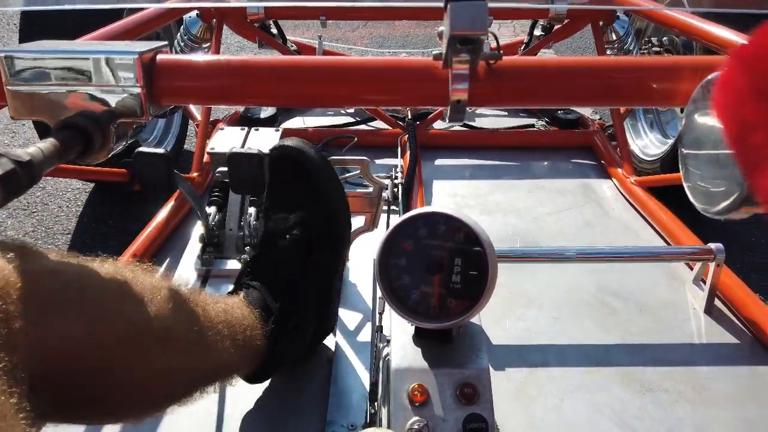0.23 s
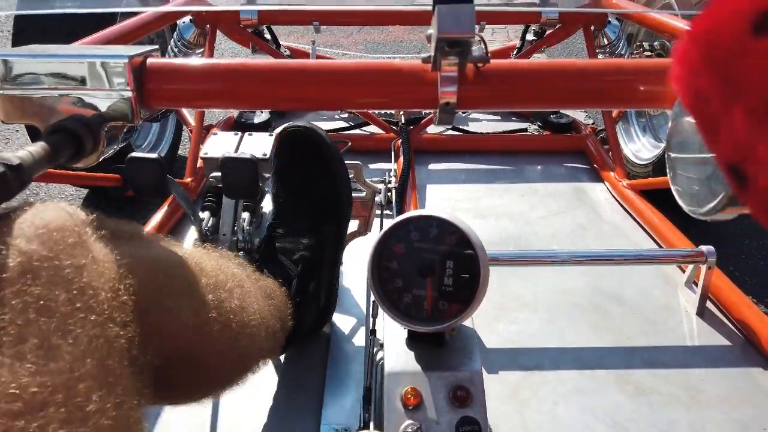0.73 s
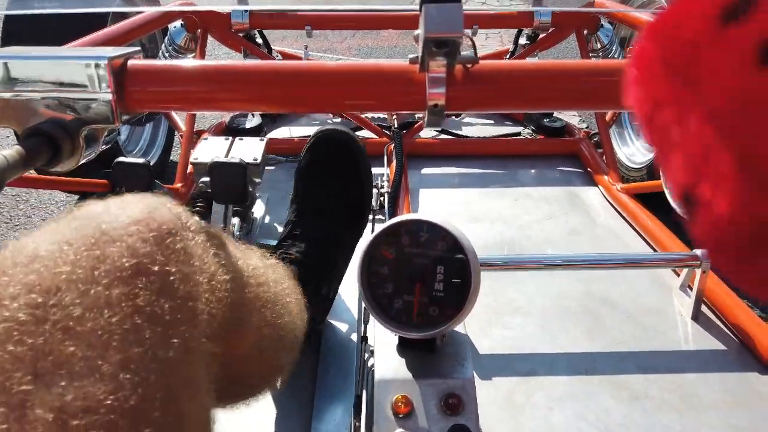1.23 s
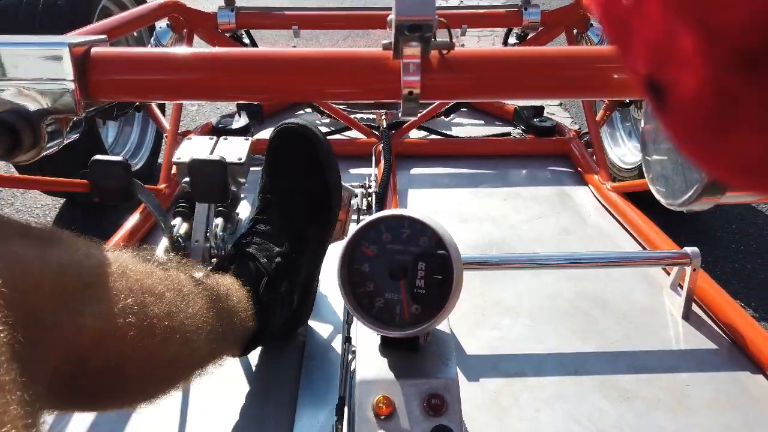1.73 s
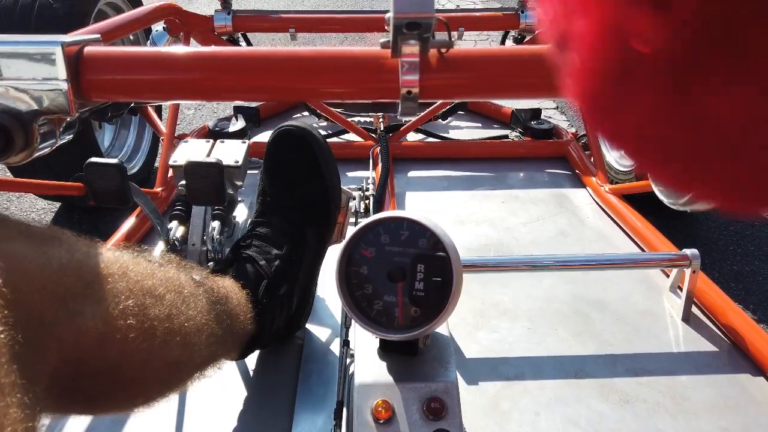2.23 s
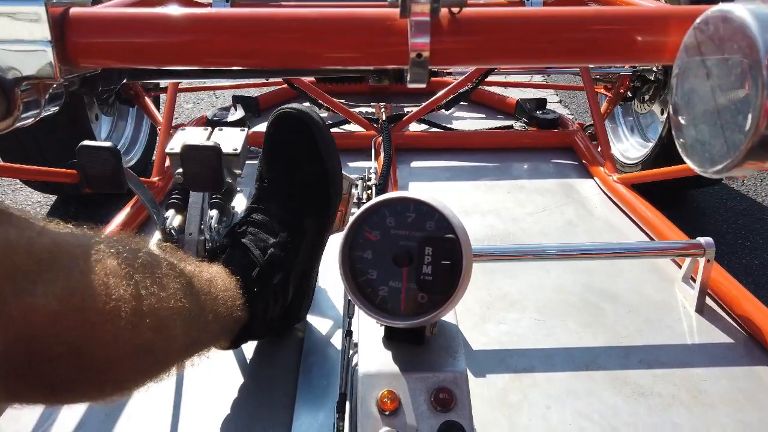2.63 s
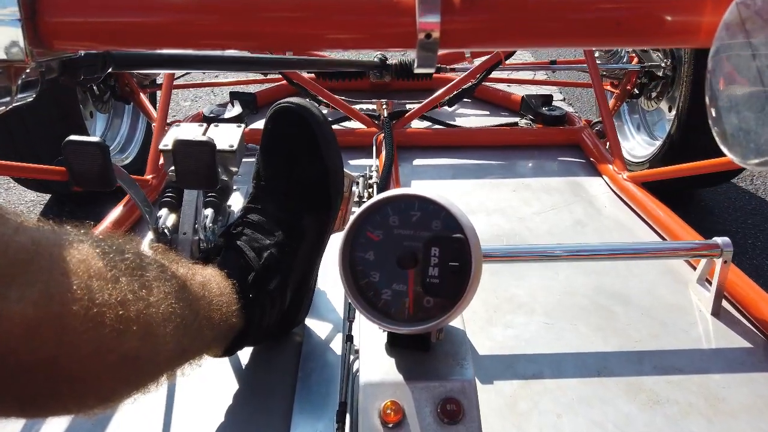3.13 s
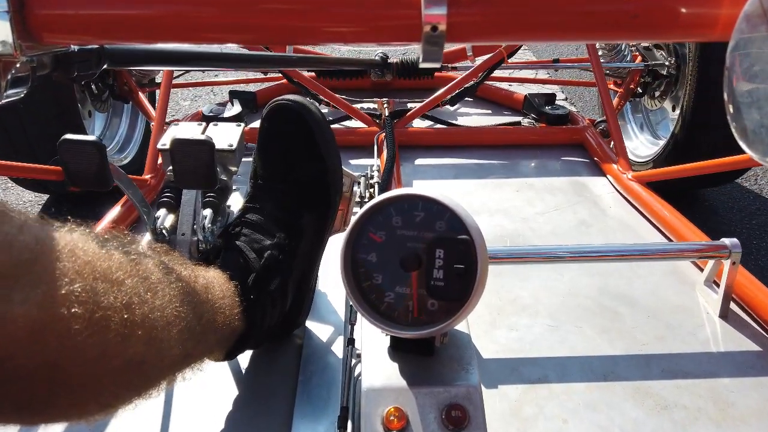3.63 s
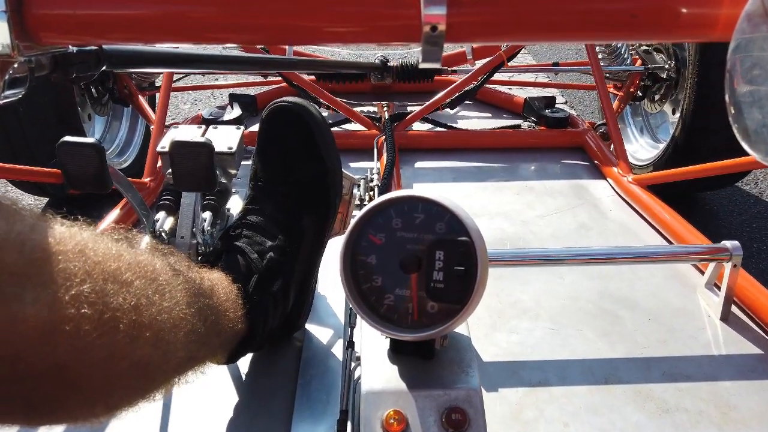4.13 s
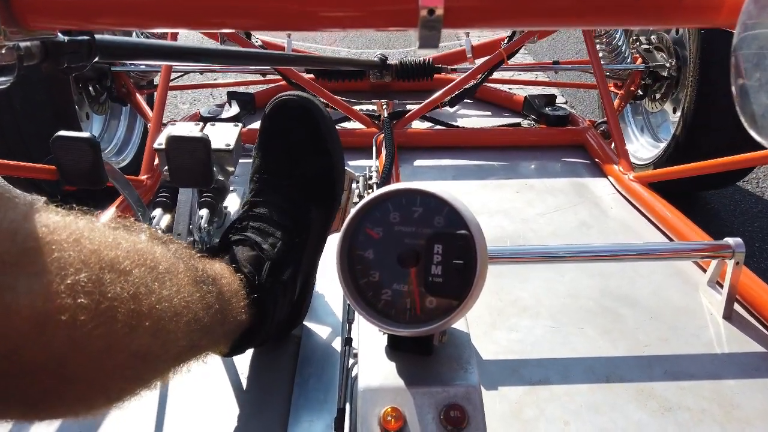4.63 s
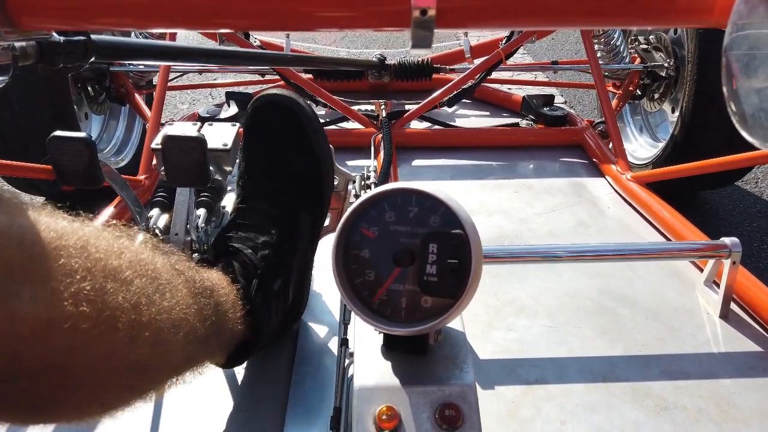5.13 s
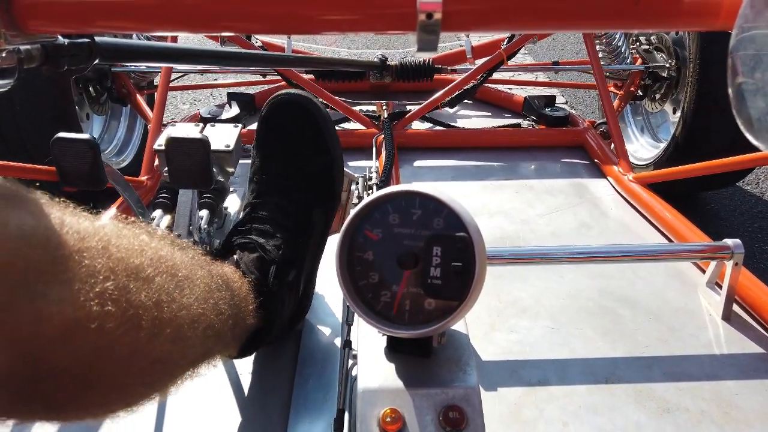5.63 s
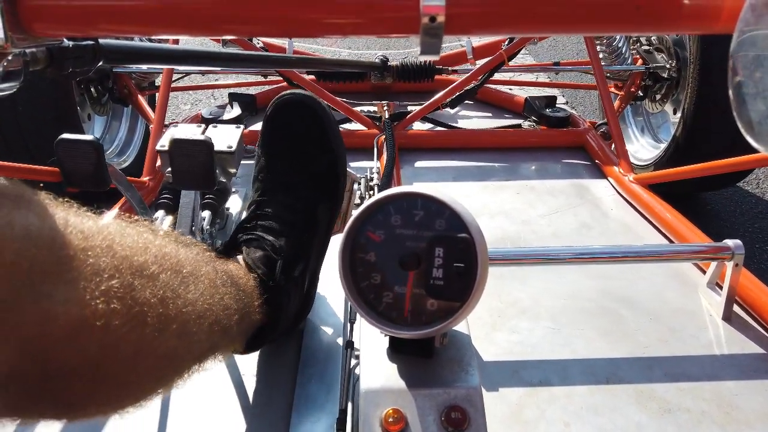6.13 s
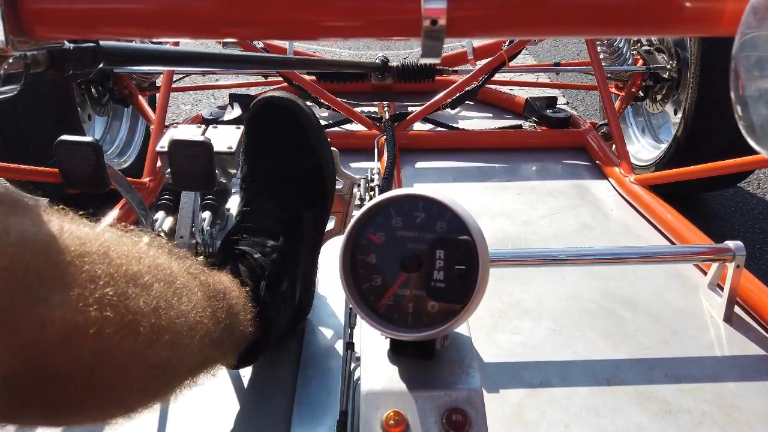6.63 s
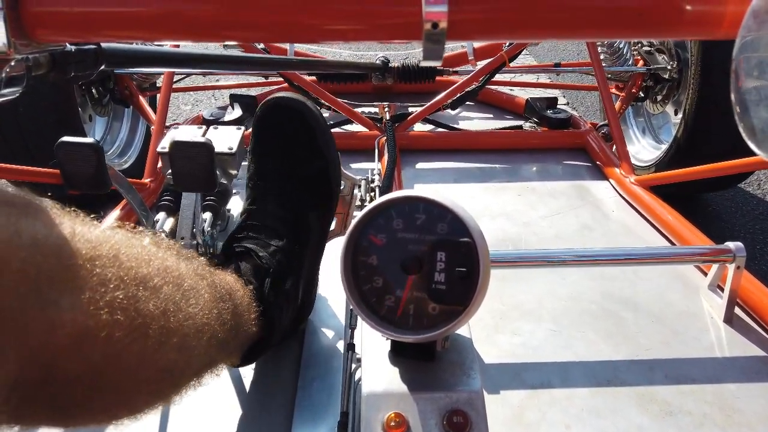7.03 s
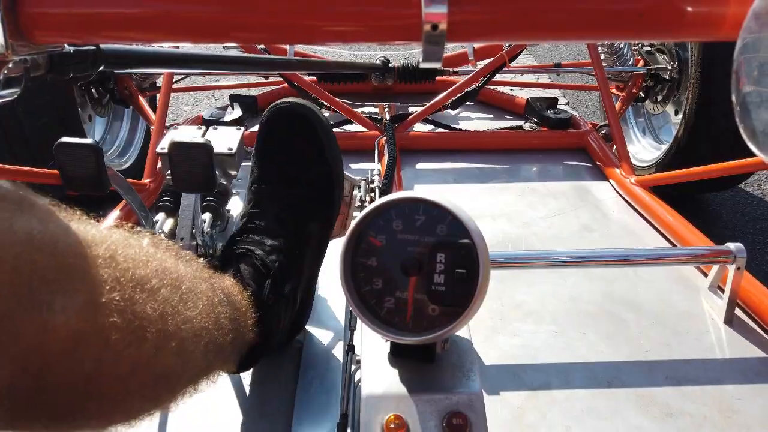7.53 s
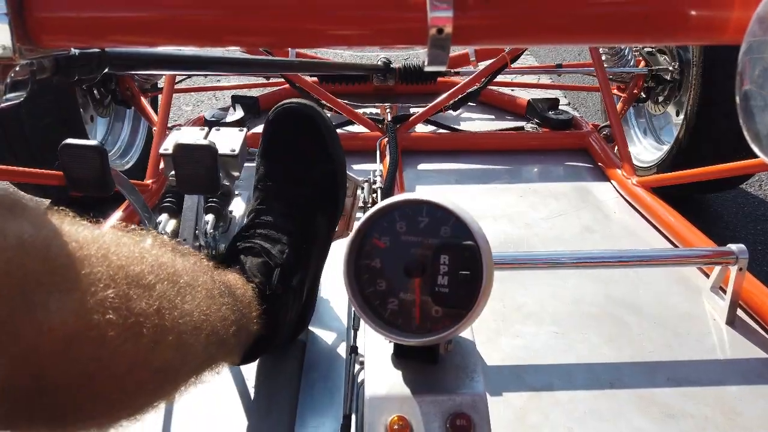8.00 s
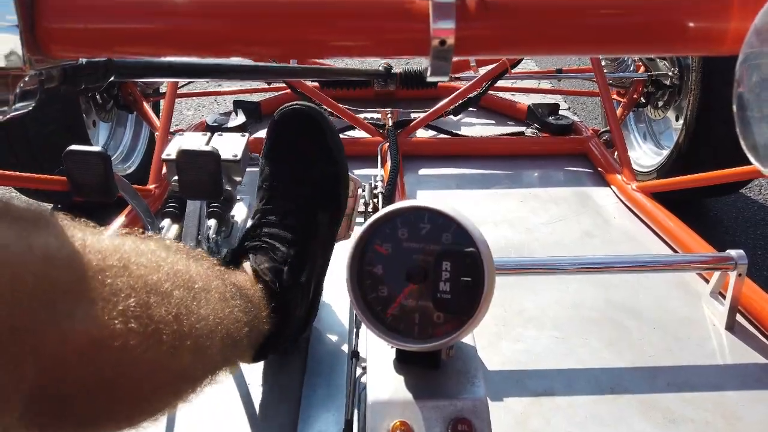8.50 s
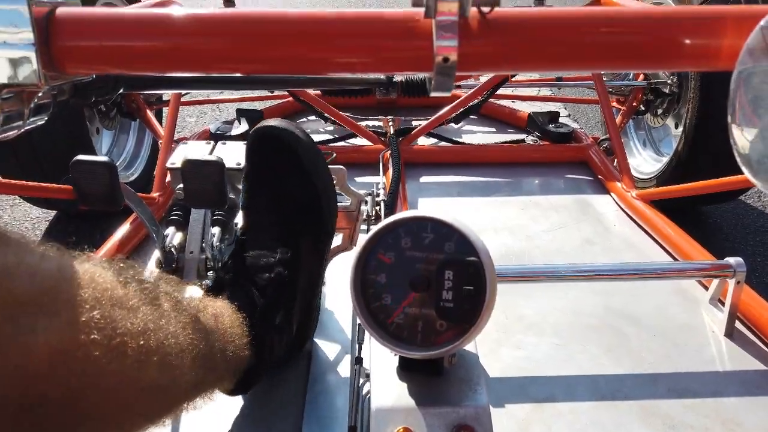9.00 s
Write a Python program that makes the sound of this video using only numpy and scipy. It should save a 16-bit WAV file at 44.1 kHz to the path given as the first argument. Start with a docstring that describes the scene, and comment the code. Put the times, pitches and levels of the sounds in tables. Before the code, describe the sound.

Heard from the open seat of a buggy outdoors, an air-cooled engine chugs at an uneven idle, missing now and then under a light metallic clatter. After several seconds come two quick revs, with faint, bright squeaks from the throttle linkage and air rushing through the carburettor. The engine sinks back and falters briefly before a last, longer and higher rev, which winds down again.

```python
"""Revving a buggy engine

An air-cooled four-cylinder engine idles lumpily, heard from the driver's seat in the open air.
Each firing rings the exhaust and shakes the block; valve gear ticks, small parts ring, the fan blows.
The pedal is pushed three times: the throttle linkage chirps, air roars in through the carburettor,
and the engine races, then runs down towards a weak, stumbling idle."""
import sys
import numpy as np
from scipy import signal
from scipy.fft import rfft, irfft, next_fast_len
from scipy.io import wavfile
from scipy.ndimage import uniform_filter1d

SR = 44100
rng = np.random.default_rng(int(sys.argv[2]) if len(sys.argv) > 2 else 0)


def dump(signal):
    """Clip the signal to [-1, 1] and save it as 16-bit WAV at the path in sys.argv[1]."""
    limited = np.clip(np.atleast_2d(signal).T, -1, 1)
    pcm = np.round(limited * 32767).astype(np.int16)
    wavfile.write(sys.argv[1], SR, pcm)


N = 408366

IDLE_RATE = 26   # the usual idle, in firings per second
# The wandering idle. Each row: time in seconds, firings per second.
IDLE_SPEED = [(0, 26.12), (.6, 25.44), (1.2, 25.99), (1.8, 25.88), (2.4, 27.07), (3, 25.67), (3.6, 26.67),
              (4.2, 26.59), (4.5, 24.71), (4.86, 28.45), (6.2, 26.41), (7.6, 24.5), (8.22, 25.6)]
# Pushes of the pedal. Each row: down and up times in seconds, top speed in firings per second,
# seconds for the speed to fall to about a third.
PEDAL_PUSHES = [(4.865, 5.098, 83.5, .827), (6.257, 6.502, 83.5, .851), (8.25, 8.645, 103.3, 1.02)]
# How strongly the engine fires when left to idle. Each row: time in seconds, level change in dB.
IDLE_STRENGTH = [(0, -0.5), (2.4, 0), (3.1, -1.5), (3.6, .5), (4.4, -2.5), (4.82, 1.5), (5.7, -2.5),
                 (6.03, -7.5), (6.2, -4), (7.15, -4), (7.5, -6.5), (7.75, -11), (8.22, -6.5)]
# The strength of each of the four cylinders at idle, in dB.
CYLINDER_DB = [-3, 0, -2.5, 0]
# Firings that miss or kick. Each row: time in seconds, dB above the usual firing.
ODD_FIRINGS = [(.15, -16), (.22, -7), (.61, -14), (.69, -6), (.93, -14), (1.16, -8), (1.54, -14),
               (1.58, 3.5), (1.85, -17), (2.08, -28), (2.31, -15), (2.6, -24), (2.68, -7), (2.91, -8),
               (3.37, -20), (3.67, -8), (4.12, -28), (5.8, 11.5), (5.96, 9.5), (6.28, 3), (7.28, 12),
               (7.41, 0), (7.55, 5), (7.59, -11), (8.0, -12), (8.26, 4)]
# How loud the layers are. Each lists: dB at idle, dB added per doubling of speed, dB added at full
# throttle, the share of IDLE_STRENGTH it follows, dB added as the engine warms up.
BOOM_LEVEL = (-20.0, 3.5, 2.5, 0.97, -0.5)
BARK_LEVEL = (-26, 6, 0, 1.0, 0)
ROAR_LEVEL = (-41, 7, 8, 0.63, -5.5)
HISS_LEVEL = (-49, 5, 2.5, 0.85, -2.5)
# With the throttle shut, the pipes favour some speeds and swallow others.
# Each row: firings per second, change to the boom in dB, change to the bark in dB.
PIPE_TUNING = [(29.6, 0.5, 0.5), (37, -8, -2.5), (46, -4, -8), (61, -0.5, -1.5), (75.9, 0, -0.5),
               (86, -3, -9.5), (104, -1.5, -5)]
# Pitches at which the exhaust (boom and bark), throttle linkage and air intake ring.
# Each row: pitch in Hz, width in Hz (narrow rings longer), relative level in dB.
BOOM_MODES = [(51.6, 10.6, 21), (85, 20, -13)]
BARK_MODES = [(156.2, 18.6, 42), (127, 18, -18), (150, 120, -21)]
LINKAGE_MODES = [(6930, 58, -6), (7340, 240, -4), (8050, 310, -4), (8700, 100, -11), (10500, 150, -11),
                 (13700, 2000, -20)]
INTAKE_MODES = [(221, 37, -0.5), (352, 230, -2), (493, 45, 1.5), (720, 53, -3), (1300, 480, 0.5)]
# The tone colour of four noises: engine block, valve knocks, cooling air and intake air.
# Each row: frequency in Hz, relative level in dB.
BLOCK_SPECTRUM = [(160, -57), (270, -2), (377, -4.5), (427, 5.5), (520, -10), (733, -4), (813, -10),
                  (977, -6), (1060, -5.5), (1410, -8.5), (2130, -10.5), (2390, -10), (3420, -15),
                  (3580, -12), (4200, -19.5), (5460, -29), (9240, -120)]
KNOCK_SPECTRUM = [(1000, -20), (2000, 5.5), (3300, 2), (4800, 4), (6300, -1.5), (8000, 0), (9500, -1.5),
                  (11000, 5), (13000, -3.5), (16000, -1.5)]
COOLING_SPECTRUM = [(1760, -18.5), (3000, 3), (3330, -7), (3620, -6), (4050, -6), (4630, -6), (6670, -6),
                    (9330, -7), (10900, -2), (15100, -14), (16000, -9)]
INTAKE_SPECTRUM = [(140, -5.5), (230, -12), (299, -16.5), (388, -12.5), (607, -20.5), (662, -11),
                   (798, -13.5), (1350, -11.5), (2130, -14), (2330, -18.5), (4500, -36), (5850, -67),
                   (9900, -120)]
# Valve gear knocks. Each row: place in the engine's cycle in firings (0-4), relative level in dB.
VALVE_KNOCKS = [(.2, -2.5), (1.45, -30), (2.16, 3), (2.85, -27), (3.34, 3.5), (3.55, -8)]
# Small parts that ring once per engine cycle, including the rattling throttle linkage.
# Each row: place in firings (0-4), pitch in Hz, width in Hz, relative level in dB.
ENGINE_RINGS = [(.23, 3675, 50.4, -2), (.3, 9900, 80, -7), (1.41, 15500, 507, -5), (2.22, 3636, 29.1, 1.5),
                (2.22, 3112, 201, 2.5), (2.74, 6900, 45, -2), (2.78, 7500, 205, -0.5),
                (3.43, 3507, 212.3, 2)]
# Chirps of the throttle linkage. Each row: time of the peak in seconds, level in dB.
LINKAGE_CHIRPS = [(4.863, -30), (4.894, -22.5), (6.231, -32), (6.265, -22), (7.856, -35), (8.248, -21.5),
                  (8.306, -23.5), (8.331, -28)]
# Echoes from the floor pan, road and frame. Each row: delay in seconds, relative level in dB.
ECHOES = [(.0029, -35.5), (.00802, -13.5), (0.0136, -16.5), (0.0183, -21)]
# How alike noise is in the two ears. Each row: frequency in Hz, likeness from 0 to 1.
EAR_LIKENESS = [(200, 1), (700, 0.91), (1400, 0.82), (2800, 0.43), (6000, 0.066), (14000, 0.14)]


def from_db(db):
    """Turn decibels into a number to multiply by."""
    return 10 ** (np.asarray(db) / 20)


def rms_one(x):
    """Scale a sound to an average (rms) level of 1."""
    return x / np.sqrt(np.mean(x ** 2) + 1e-20)


def in_time(rows):
    """Join (time, value) points into a curve with a value for every sample."""
    return np.interp(np.arange(N) / SR, *np.transpose(rows))


def at_hz(rows, hz):
    """Read between (frequency, value) points, with octaves evenly spaced."""
    known_hz, values = np.transpose(rows)
    return np.interp(np.log(hz), np.log(known_hz), values)


def keep_band(x, hz, kind, order=2):
    """Keep the "low" part, the "high" part or a middle "band" of a sound."""
    return signal.sosfilt(signal.butter(order, hz, kind, fs=SR, output="sos"), x)


def resonate(x, modes):
    """Let a sound ring an object at several pitches at once."""
    out = 0
    for hz, width, db in modes:
        r = np.exp(-np.pi * width / SR)
        feedback = [1, -2 * r * np.cos(2 * np.pi * hz / SR), r * r]
        out += from_db(db) * (1 - r * r) / 2 * signal.lfilter([1, 0, -1], feedback, x + 1e-18)
    return out


def noise(spectrum=None):
    """Stereo noise whose treble differs between the ears more than its bass."""
    size = next_fast_len(N)
    hz = np.maximum(np.fft.rfftfreq(size, 1 / SR), 1)
    mid, side = rfft(rng.standard_normal((2, size)))
    alike = np.clip(at_hz(EAR_LIKENESS, hz), 0, 1)
    ears = np.sqrt(1 + alike) * mid + np.sqrt(1 - alike) * side * [[1], [-1]]
    colour = 1 if spectrum is None else from_db(at_hz(spectrum, hz))
    return rms_one(irfft(colour * ears, size)[:, :N])


def bursts(times, sizes, rise_s):
    """A bump for each time: it peaks at its size after rise_s, then dies away."""
    clicks = np.zeros(N)
    np.add.at(clicks, np.clip((times * SR).astype(int), 0, N - 1), sizes)
    r = np.exp(-1 / (rise_s * SR))
    return signal.lfilter([0, np.e / (rise_s * SR)], [1, -2 * r, r * r], clicks + 1e-18)


def evened(x, window_s):
    """Even out slow changes in loudness but keep the single beats."""
    size = int(window_s * SR)
    power = uniform_filter1d(uniform_filter1d(x * x, size), size)
    return x / np.sqrt(np.maximum(power, 1e-12))


def crank_times(crank, place, every):
    """Times at which the crank passes a place that comes round every so many firings."""
    return np.interp(np.arange(place, crank[-1], every), crank, np.arange(N) / SR)


def strikes(crank, place, rise_s, scatter_db=1.86):
    """A loose contact that comes round every four firings, never quite equally hard."""
    times = crank_times(crank, place, every=4)
    sizes = from_db(scatter_db * rng.standard_normal(len(times)))
    return uniform_filter1d(bursts(times, sizes, rise_s), size=260)   # slack spreads each contact


def reflected(x):
    """Hard surfaces close by send the sound back and colour it."""
    out = x.copy()
    for delay_s, db in ECHOES:
        out += from_db(db) * np.pad(x, ((0, 0), (int(delay_s * SR), 0)))[:, :N]
    return out / np.sqrt(1 + sum(from_db(db) ** 2 for _, db in ECHOES))


def engine_speed():
    """Firings per second: a steady climb while the pedal is down, then friction slows the engine."""
    seconds = np.arange(N) / SR
    speed = in_time(IDLE_SPEED)
    for down_s, up_s, top, run_down_s in PEDAL_PUSHES:
        climb = np.interp(seconds, [down_s, up_s], [speed[int(down_s * SR)], top], left=0)
        run_down = np.exp(-np.maximum(seconds - up_s, 0) / run_down_s)
        speed = np.maximum(speed, climb * run_down)
    return speed


def throttle_opening(rest=.034, pressed=.86, open_s=.025, shut_s=.062):
    """The throttle (0 shut, 1 wide open) swings open with each push and snaps back on release."""
    seconds = np.arange(N) / SR
    pedal = 0
    for down_s, up_s, _, _ in PEDAL_PUSHES:
        opening = 1 - np.exp(-np.maximum(seconds - down_s, 0) / open_s)
        closing = np.clip(.5 + (up_s - seconds) / shut_s, 0, 1)
        pedal += opening * closing
    return np.clip(rest + (pressed - rest) * pedal, 0, 1)


def loudness(speed, throttle, warm_up_s=6.15, flywheel_rate=75):
    """Boom, bark, roar and hiss in dB: they rise as the engine revs and sag with a weak idle."""
    doublings = np.log2(speed / IDLE_RATE)
    # at speed, the flywheel hides a weak idle
    idling = np.interp(speed, [IDLE_RATE, flywheel_rate], [1, 0]) * (1 - throttle)
    strength_db = idling * in_time(IDLE_STRENGTH)
    warmth = np.minimum(np.arange(N) / SR / warm_up_s, 1)
    layers = BOOM_LEVEL, BARK_LEVEL, ROAR_LEVEL, HISS_LEVEL
    boom, bark, roar, hiss = (
        idle_db + speed_db * doublings + throttle_db * throttle + share * strength_db + warm_db * warmth
        for idle_db, speed_db, throttle_db, share, warm_db in layers)
    rates, boom_tuning, bark_tuning = np.transpose(PIPE_TUNING)
    boom += (1 - throttle) * np.interp(speed, rates, boom_tuning)
    bark += (1 - throttle) * np.interp(speed, rates, bark_tuning)
    roar += 2 * doublings * throttle   # an open throttle makes the roar grow faster with speed
    return boom, bark, roar, hiss


def firings(crank, speed, throttle, smooth_rate=55, scatter_db=2, jitter_s=.00092, load_jitter_s=.00037):
    """Time and strength of each firing: uneven at idle, smoother at speed, ragged under load."""
    times = crank_times(crank, place=1, every=1)
    at = (times * SR).astype(int)
    lumpy = np.clip((smooth_rate - speed[at]) / (smooth_rate - IDLE_RATE), .1, 1)
    size_chance, time_chance = rng.standard_normal((len(times), 2)).T
    cylinder = np.arange(1, len(times) + 1) % 4
    db = lumpy * (np.array(CYLINDER_DB)[cylinder] + scatter_db * size_chance)
    for time_s, odd_db in ODD_FIRINGS:
        db[np.argmin(abs(times - time_s))] += odd_db
    spread_s = np.maximum(jitter_s * lumpy, load_jitter_s * throttle[at])
    return times + spread_s * time_chance, from_db(db)


def exhaust(times, sizes, throttle, boom_db, bark_db):
    """Each firing rings the pipes with a deep boom and a higher bark; off the throttle they burble."""
    def pulses(lead_s):
        return -bursts(times - lead_s, sizes, rise_s=.0011)
    boom = keep_band(resonate(pulses(.0013), BOOM_MODES), [32, 150], "band")
    bark = keep_band(resonate(pulses(.0036), BARK_MODES), 235, "low", order=6)
    bark = keep_band(bark, 85, "high")
    burble = rms_one(keep_band(rng.standard_normal(N), [95, 225], "band", order=6))
    rough_bark = evened(bark, window_s=.17) + from_db(-11) * (1 - throttle) * burble
    # under load the pulses blast straight out instead of booming
    blast = keep_band(pulses(.0025), 45, "high", order=1)
    blast = evened(keep_band(blast, 215, "low", order=4), window_s=.05)
    bass = (1 - throttle) * evened(boom, window_s=.18) + throttle * from_db(1) * blast
    return from_db(boom_db) * bass + from_db(bark_db) * rough_bark


def block_rumble(times, sizes, throb=.18):
    """The engine's metal block rumbles, swelling a little with each firing."""
    beat = evened(bursts(times, np.sqrt(sizes), rise_s=.0035), window_s=.18)
    return noise(BLOCK_SPECTRUM) * evened(1 + throb * beat, window_s=.098)


def valve_gear(crank, grain=.27):
    """The parts that work the valves make the same gritty knocks in every engine cycle."""
    knocks = sum(from_db(db) * strikes(crank, place, rise_s=.0043) for place, db in VALVE_KNOCKS)
    flicker = rms_one(keep_band(rng.standard_normal(N), 1260, "low"))
    grit = np.exp(grain * flicker - grain ** 2)
    return from_db(3.5) * knocks * grit * noise(KNOCK_SPECTRUM)


def engine_rings(crank):
    """Small parts, including the rattling throttle linkage, ring once per engine cycle."""
    def tone(hz, width):
        drift = np.sqrt(2 * np.pi * width / SR) * rng.standard_normal(N)
        return np.sqrt(2) * np.sin(np.cumsum(2 * np.pi * hz / SR + drift))
    return from_db(-.5) * sum(from_db(db) * strikes(crank, place, rise_s=.0042) * tone(hz, width)
                              for place, hz, width, db in ENGINE_RINGS)


def fan_whine(crank, blades_per_firing=28):
    """The cooling fan's blades make an unsteady tone that follows the engine's speed."""
    wobble = 1.56 * rms_one(keep_band(rng.standard_normal(N), 12, "low"))
    return np.sin(2 * np.pi * blades_per_firing * crank + wobble)


def cooling_air():
    """Air hisses as it rushes over the engine."""
    return from_db(4.5) * noise(COOLING_SPECTRUM)


def linkage_chirps(swell_s=.0039):
    """The linkage between pedal and throttle slips in short, bright chirps that swell and fade."""
    ringing = rms_one(keep_band(resonate(noise(), LINKAGE_MODES), 4900, "high", order=4))
    seconds = np.arange(N) / SR
    swells = sum(from_db(db) / np.cosh(np.minimum(abs(seconds - peak_s) / swell_s, 20))
                 for peak_s, db in LINKAGE_CHIRPS)
    return ringing * swells


def intake_roar(times, sizes):
    """The engine gulps air through the carburettor, and each sharp suck makes the intake ring."""
    gulps = evened(bursts(times - .004, sizes, rise_s=.0042), window_s=.07)
    suction = -bursts(times - .002, sizes, rise_s=.0004)
    thump = keep_band(resonate(suction, INTAKE_MODES), 170, "high", order=4)
    return noise(INTAKE_SPECTRUM) * gulps + from_db(-1) * evened(thump, window_s=.079)


def scene():
    """Speed and throttle drive all the engine's sounds; the linkage chirps on top."""
    speed, throttle = engine_speed(), throttle_opening()
    boom_db, bark_db, roar_db, hiss_db = loudness(speed, throttle)
    crank = .2 + np.cumsum(speed) / SR   # how far the engine has turned, counted in firings
    times, sizes = firings(crank, speed, throttle)
    slowness = IDLE_RATE / speed   # at speed, rushing air covers the fan's tone and the clatter
    fan = from_db(-13) * np.sqrt(slowness) * (1 - throttle) * fan_whine(crank)
    # as the throttle opens, the intake takes over from the block
    block = from_db(1.5) * np.sqrt(1 - throttle) * reflected(block_rumble(times, sizes))
    intake = from_db(.5) * np.sqrt(throttle) * intake_roar(times, sizes)
    clatter = from_db(6.5) * slowness ** .8 * (valve_gear(crank) + engine_rings(crank))
    middle = from_db(roar_db) * (block + intake + fan)
    treble = from_db(hiss_db) * reflected(cooling_air() + clatter)
    return exhaust(times, sizes, throttle, boom_db, bark_db) + middle + treble + linkage_chirps()


def record(dry, left_lead_samples=2, merge_hz=260, cutoff_hz=15950):
    """The sound reaches the left side just before the right; the bass is alike in both, the top is cut."""
    left, right = dry[0], np.pad(dry[1], (left_lead_samples, 0))[:N]
    side = keep_band((left - right) / 2, merge_hz, "high", order=1)
    stereo = (left + right) / 2 + side * [[1], [-1]]
    return signal.sosfilt(signal.ellip(12, .1, 80, cutoff_hz, fs=SR, output="sos"), stereo)


dry = scene()
out = record(dry)
dump(out)
```